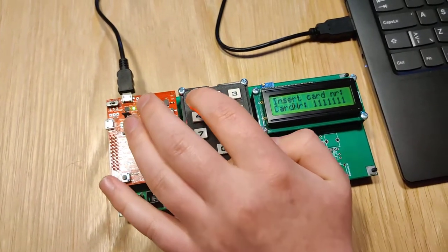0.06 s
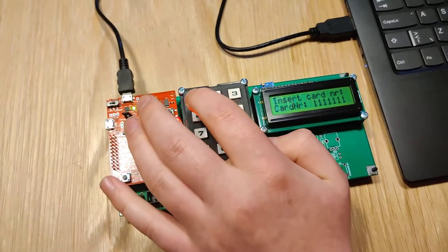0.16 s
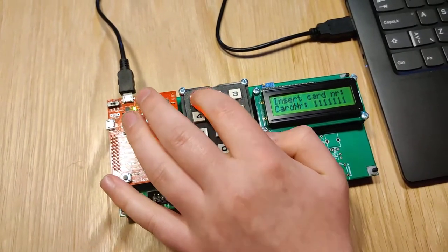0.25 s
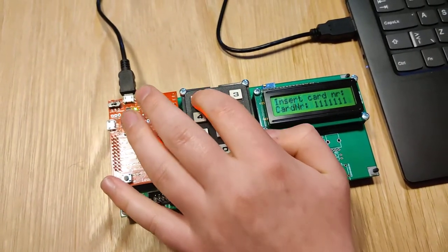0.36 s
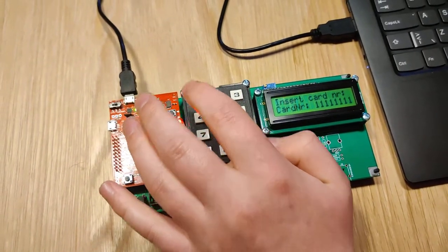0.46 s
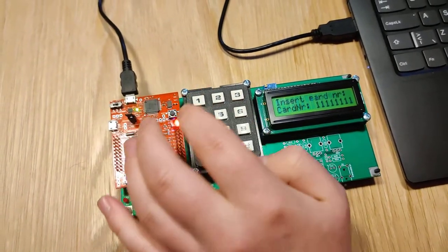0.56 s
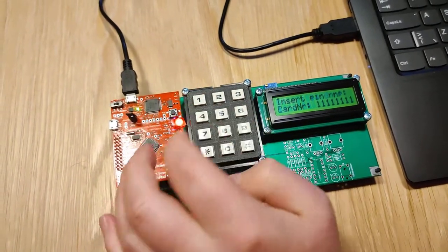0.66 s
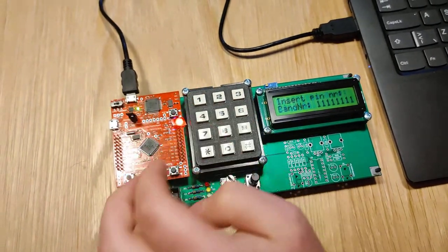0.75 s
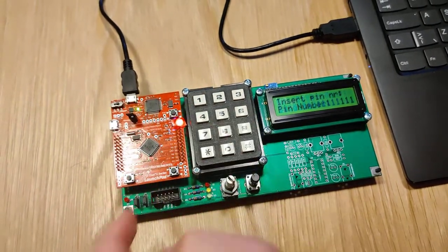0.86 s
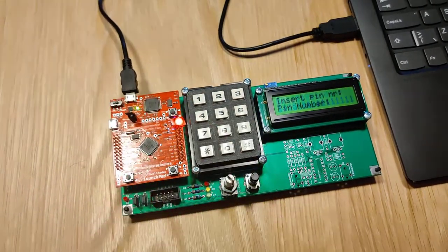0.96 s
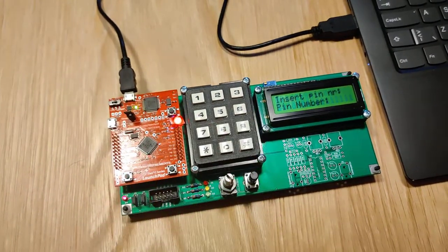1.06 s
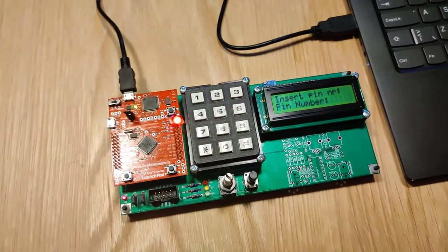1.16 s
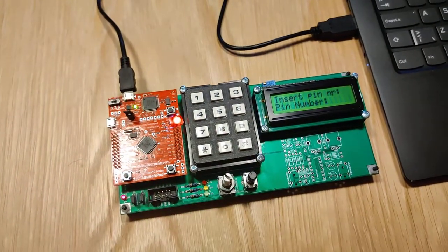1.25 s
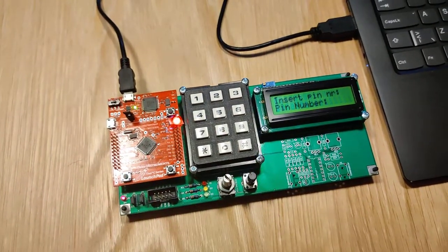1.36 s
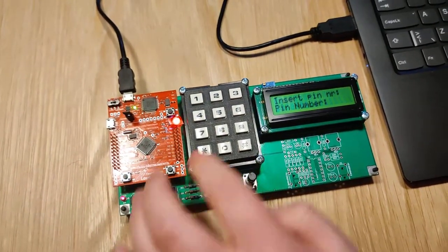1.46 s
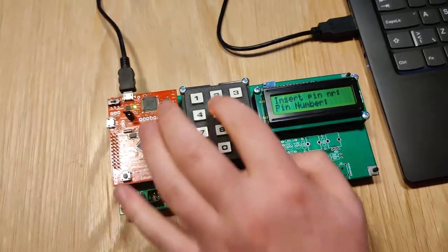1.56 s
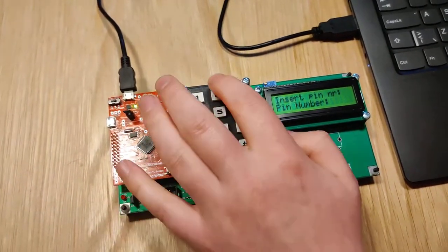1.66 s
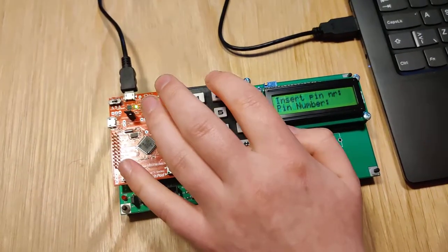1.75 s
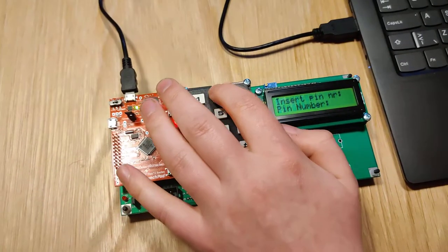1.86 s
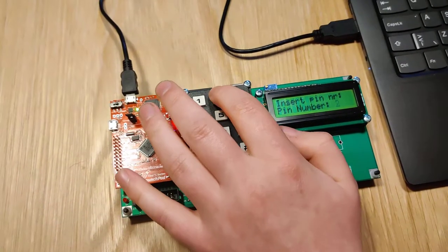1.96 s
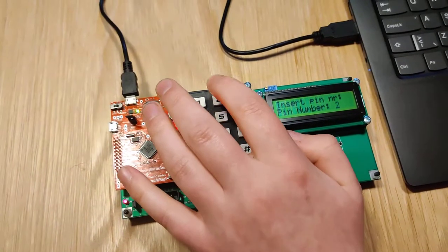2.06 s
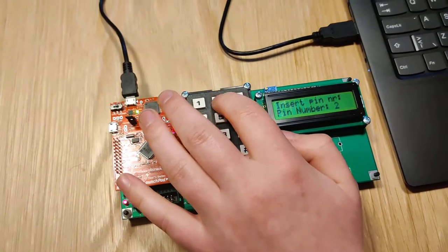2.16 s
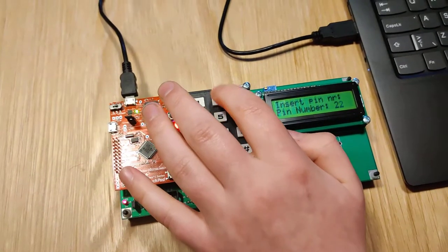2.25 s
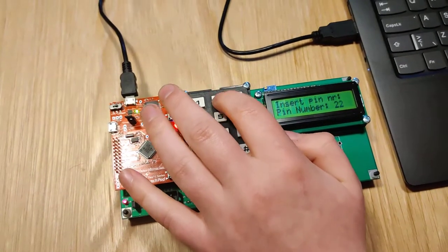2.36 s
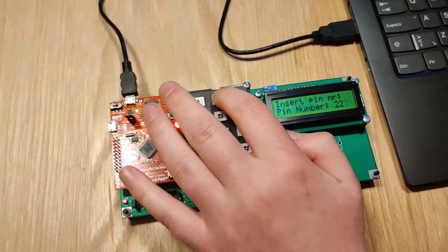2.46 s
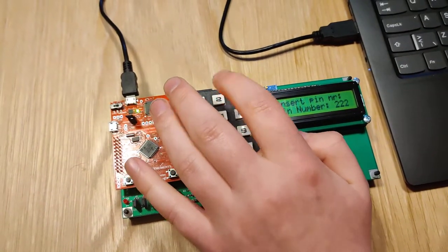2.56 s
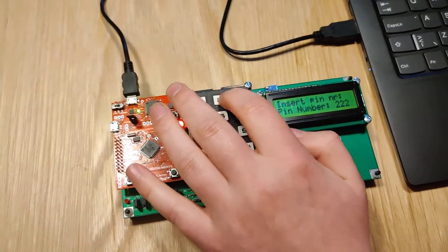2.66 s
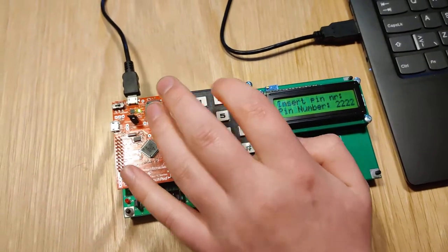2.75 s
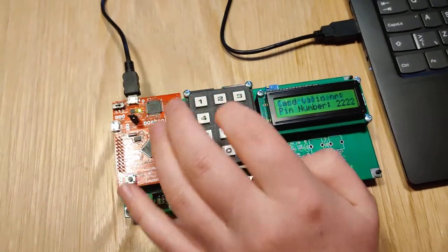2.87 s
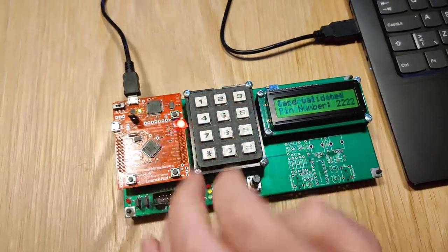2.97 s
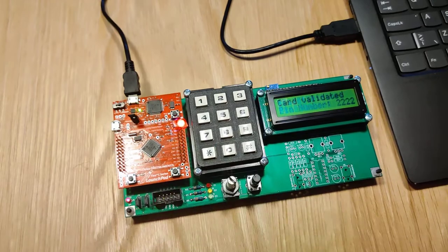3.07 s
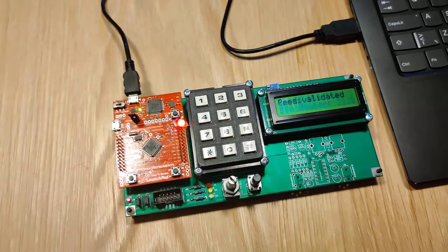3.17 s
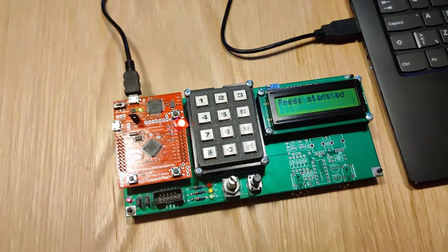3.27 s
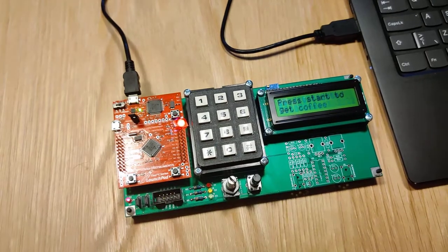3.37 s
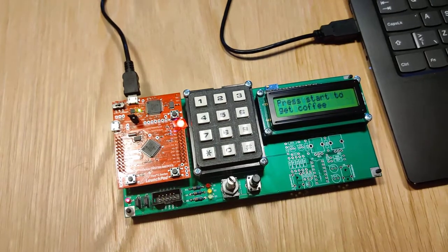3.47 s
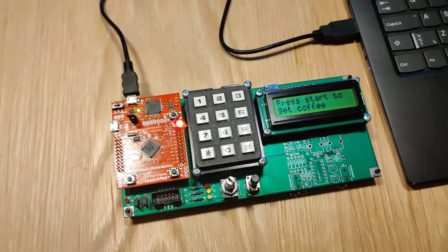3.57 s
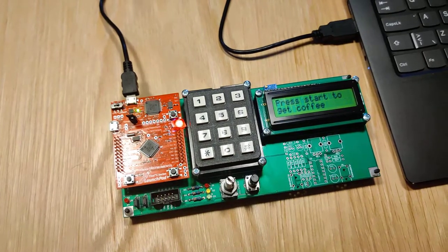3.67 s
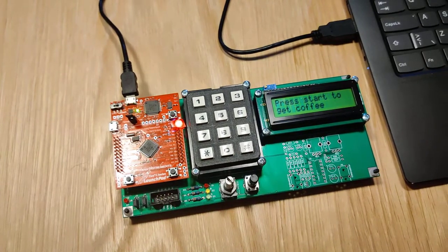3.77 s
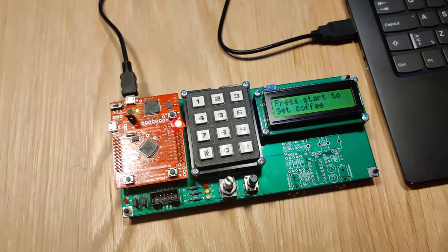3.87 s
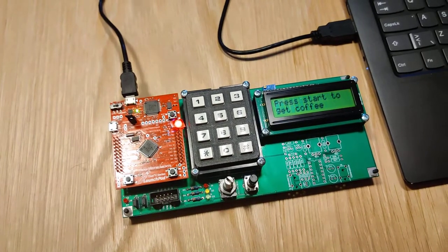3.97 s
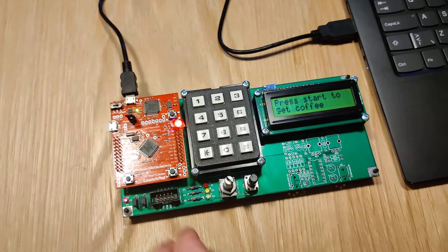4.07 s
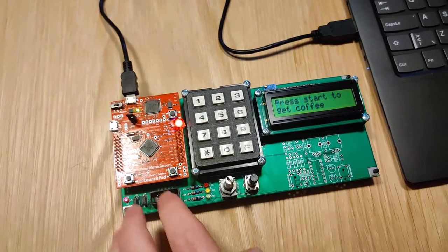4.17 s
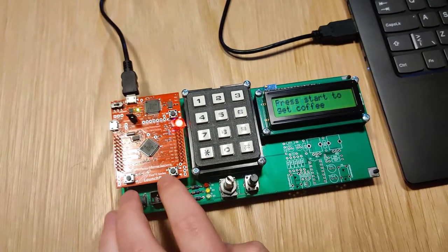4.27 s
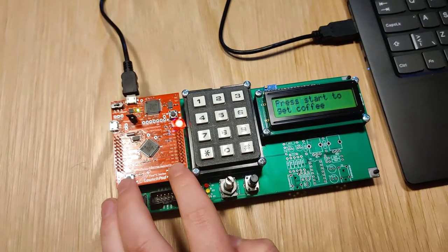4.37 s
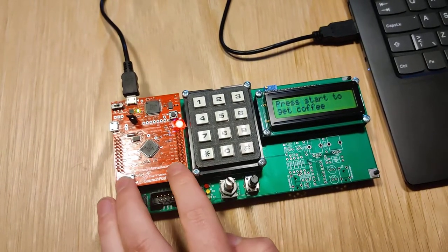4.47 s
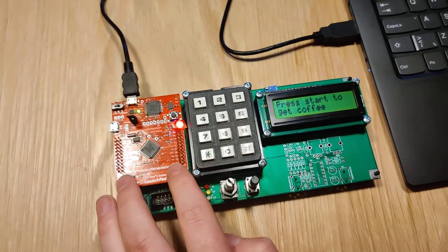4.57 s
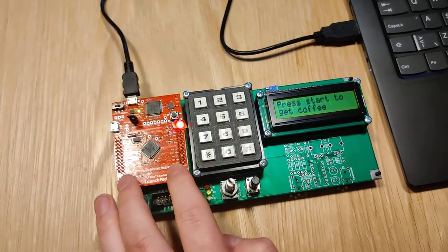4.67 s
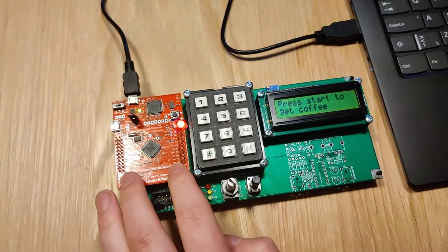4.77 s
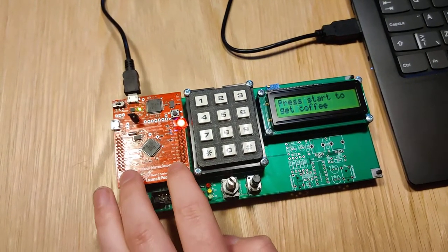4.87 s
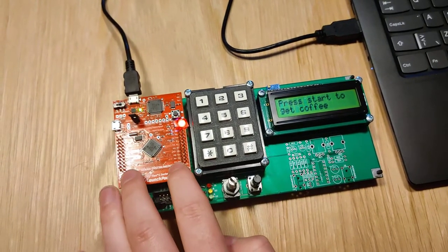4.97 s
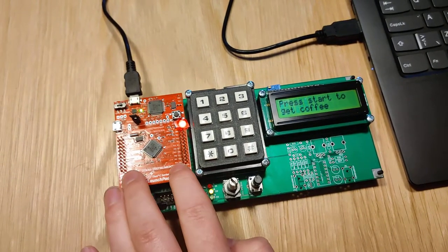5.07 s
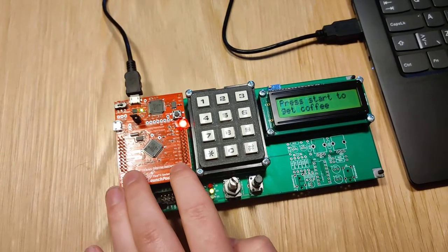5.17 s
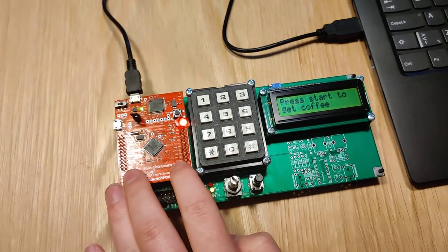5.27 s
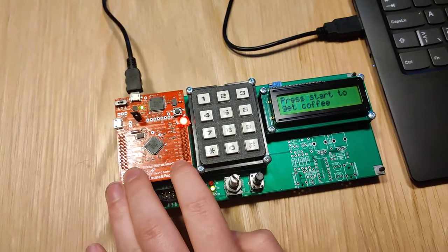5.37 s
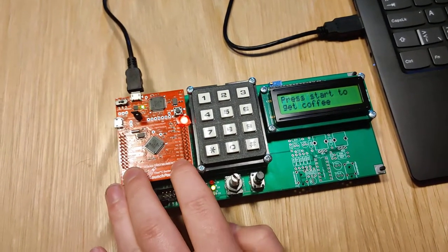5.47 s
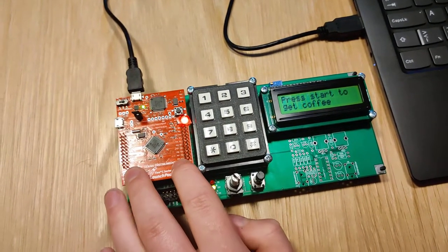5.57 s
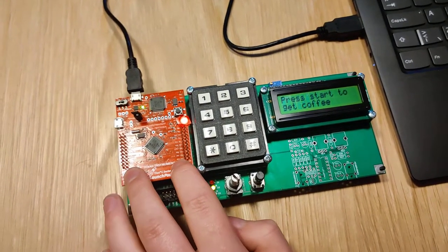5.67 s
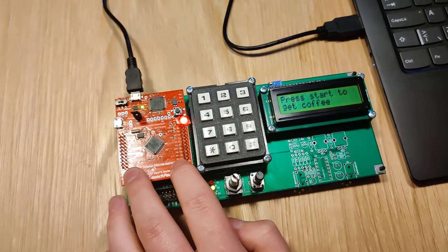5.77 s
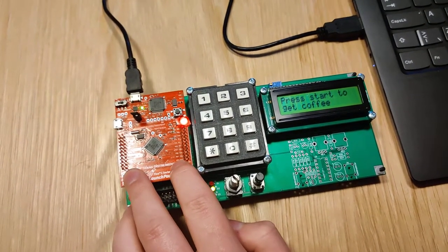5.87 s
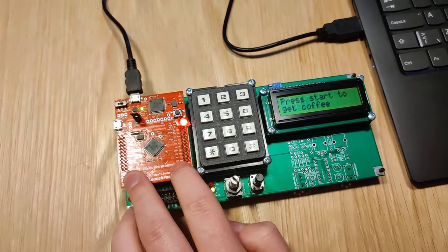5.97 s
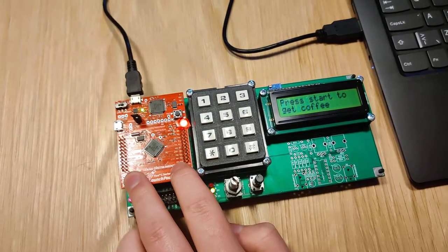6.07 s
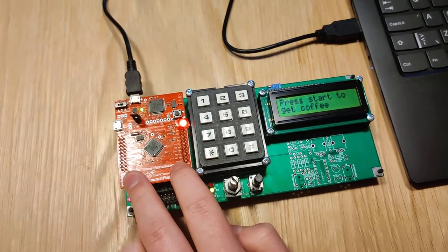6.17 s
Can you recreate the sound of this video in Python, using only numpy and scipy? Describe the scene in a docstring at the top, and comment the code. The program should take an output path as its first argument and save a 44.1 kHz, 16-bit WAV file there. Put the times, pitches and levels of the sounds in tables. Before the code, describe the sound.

Crisp keypad clicks, each a dry plastic snap with a small woody thump under it, are heard very close in a quiet indoor space. A single press opens, soft sleeve friction follows, then four presses come in rapid succession, the last brightest. After another sleeve rub and a dull hand bump, a small push switch gives a couple of thin ticks. Short near echoes, faint room tail, gentle rumble and hiss throughout.

```python
"""A quiet room, a circuit board on a wooden desk, close two-port microphone: keypad keys and a tiny switch click.
Clicks are knocks ringing damped plastic and board modes, plus a short snap; each press also thumps the
desk's own modes. Shaped noise makes the sleeve sliding over wood, the low rumble, the wash and the hiss;
wavering near sines make the hums. Near echoes and a room tail surround the clicks."""
import sys
import numpy as np
from scipy import signal
from scipy.io import wavfile
from scipy.ndimage import uniform_filter1d

SR = 44100
rng = np.random.default_rng(int(sys.argv[2]) if len(sys.argv) > 2 else 0)


def log_audio(samples):
    """Write samples as a 16-bit WAV file to the path given in sys.argv[1]."""
    # one column per channel
    frames = np.atleast_2d(samples).T
    # limit to full scale, then quantise
    limited = np.clip(frames, -1, 1)
    pcm = np.round(limited * 32767).astype(np.int16)
    wavfile.write(sys.argv[1], SR, pcm)


N = 274743  # length in samples


def gain_of(db):
    """Amplitude factor of a level in dB."""
    return 10 ** (np.asarray(db) / 20)


def evened(x):
    """Scales to rms 1."""
    return x / np.sqrt(np.mean(x ** 2) + 1e-20)


def read(points, hz):
    """Reads a table on a log-frequency axis."""
    f, value = np.transpose(points)
    return np.interp(np.log(hz + 1), np.log(f + 1), value)


def add(mix, s, sound):
    """Mixes a sound in at a time in seconds, cut at the end of the mix."""
    part = mix[..., round(s * SR):][..., :sound.shape[-1]]
    part += sound[..., :part.shape[-1]]


def swell(t, start, top, stop, start_db, stop_db):
    """Level in dB that climbs to 0 at the top and sinks again."""
    return np.interp(t, [start, np.clip(top, start, stop), stop], [start_db, 0, stop_db])


# left-right likeness of every noise, before each noise scales it: pitch_hz, likeness (no unit)
PORT_LIKENESS = [(60, 0.46), (180, 0.56), (550, 0.4), (1650, -0.1), (4970, 0.11), (15000, -0.1)]
# stereo balance of every noise: pitch_hz, left_minus_right_db
PORT_TILT = [(60, -2.5), (130, 2.5), (290, 0.5), (640, 0.0), (1410, 0.5), (3100, -3.5), (6820, -4),
             (15000, 5)]


def noise(colour, likeness, patchy_db, size=1024):
    """Two-port noise of rms 1 from random short-time spectra with drifting patches."""
    frames, hz = 4 * N // size + 5, np.fft.rfftfreq(size, 1 / SR)
    a, b, c, d, patches = rng.standard_normal((frames, len(hz), 5)).T
    patches = uniform_filter1d(patches, size=12, axis=0)  # smooth over frequency
    patches = evened(uniform_filter1d(patches, size=14, axis=1))  # smooth over time
    same = np.clip(likeness * read(PORT_LIKENESS, hz), -1, 1)[:, None]
    left = a + 1j * b
    right = same * left + np.sqrt(1 - same ** 2) * (c + 1j * d)
    tilt_db = np.multiply.outer([.5, -.5], read(PORT_TILT, hz))[..., None]
    level_db = read(colour, hz)[:, None] + patchy_db * patches + tilt_db
    spectra = np.array([left, right]) * gain_of(level_db)
    return evened(signal.istft(spectra, nperseg=size, noverlap=size - size // 4)[1][:, :N])


# level curve of the low rumble and mid wash: time_s, rumble_db, wash_db
BACKGROUND_LEVELS = [(0.0, -59, -64.5), (.43, -57, -66), (.75, -58, -66.5), (1.2, -56, -61),
                     (1.75, -55.5, -64.5), (2.25, -52, -63), (2.8, -44.5, -60.5), (3.05, -58.5, -63.5),
                     (3.6, -62, -65.5), (4.01, -56.5, -62), (4.35, -59.5, -64), (5.1, -56, -66.5),
                     (5.659, -60.5, -67.5), (6.23, -58, -67.5)]
# noise spectra, relative: pitch_hz, level_db (per Hz)
RUMBLE_COLOUR = [(7.1, -29.5), (14, -9), (30, -9), (44, 1.5), (56, -6.5), (75, -19.5), (112, -23.5),
                 (146, -27), (158, -15), (174, -23), (200, -23.5), (260, -46), (440, -120)]
WASH_COLOUR = [(71, -32), (120, -5.5), (151, -10.5), (173, -21), (226, -2.5), (280, -6.5), (316, -7),
               (1370, -18), (3000, -29), (3900, -52.5), (6600, -120)]
HISS_COLOUR = [(710, -38.5), (1200, -3), (1460, -9), (2510, -2), (3360, -7.5), (3700, -4), (4220, -7.5),
               (6160, -10), (8820, -13.5), (15000, -8), (16000, -7.5)]
HISS_DB = -67


def background():
    """Slowly changing low rumble, swelling under the key thumps, and mid wash over steady hiss."""
    t = np.arange(N) / SR
    s, rumble_db, wash_db = np.transpose(BACKGROUND_LEVELS)
    rumble = noise(RUMBLE_COLOUR, likeness=1.66, patchy_db=1.6, size=4096)
    rumble *= gain_of(np.interp(t, s, rumble_db))
    wash = noise(WASH_COLOUR, likeness=1.2, patchy_db=1.56, size=2048)
    wash *= gain_of(np.interp(t, s, wash_db))
    hiss = gain_of(HISS_DB) * noise(HISS_COLOUR, likeness=.9, patchy_db=1.5)
    return rumble + wash + hiss


# faint hums from outside, before wavering: start_s, loudest_s, end_s, first_hz, last_hz, top_db (rms)
HUM_SWELLS = [(2.4, 3.35, 3.95, 304, 322, -64), (2.95, 3.4, 3.9, 378, 390, -69),
              (4.65, 5.4, 6.22, 145, 147, -68), (1.4, 1.65, 1.9, 226, 234, -63),
              (2.5, 3.2, 3.85, 90, 90, -64), (4.5, 5.8, 6.22, 47, 48, -61), (.01, .12, .36, 62, 60, -61),
              (.01, .12, .28, 338, 335, -67)]
HUM_ENDS_DB = -8  # below the top at either end


def hums():
    """Near sines that swell, drift in pitch and waver."""
    out = np.zeros(N)
    for start, top, stop, first_hz, last_hz, db in HUM_SWELLS:
        t = np.arange(start, stop, 1 / SR)
        waver = uniform_filter1d(rng.standard_normal(N), size=3000)
        waver = evened(uniform_filter1d(waver, size=3000))
        hz = np.linspace(first_hz, last_hz, len(t)) * (1 + .005 * waver[:len(t)])
        turns = np.cumsum(hz) / SR
        level_db = db + swell(t, start, top, stop, HUM_ENDS_DB, HUM_ENDS_DB)
        level_db += 1.6 * waver[::-1][:len(t)]  # the reversed curve wavers the level
        sine = np.sqrt(2) * np.sin(2 * np.pi * turns)
        add(out, start, gain_of(level_db) * sine * signal.windows.tukey(len(t), .2))
    return out


# the key cap striking its stop: pitch_hz, length_s, left_minus_right_db, left_lead_rad
CAP_SNAP = (7400, .00062, -6, 2.)


def stop_snap(since, side):
    """A short sine burst under a rounded envelope, as the cap strikes its stop."""
    hz, length, pan_db, lead = CAP_SNAP
    envelope = np.sin(np.pi * np.minimum(since / length, 1)) ** 2
    return gain_of(side * pan_db) * envelope * np.sin(2 * np.pi * hz * since + side * lead)


TOUCH_S, TOUCH_DB = 0.0038, -39  # rubbing before each blow
BUILD_UP = 0.037  # share of its t60 that a mode needs to build up
SNAP_AT = 0.93  # share of the rise that passes before the snap
RATTLE_S, RATTLE_PER_RISE = 0.0018, 0.77  # a slower stroke rattles longer


def click(row, modes, luck, low_hz, split_hz, bright_hz):
    """Touch, rattle of knocks on damped modes, and snap; returns the direct and the spread sound."""
    _, rattle_db, snap_db, ring_db, bright_db, rise, _ = row
    rattle_s = RATTLE_S + RATTLE_PER_RISE * rise
    t, side = np.arange(2048) / SR, np.array([[.5], [-.5]])
    since = np.maximum(t - TOUCH_S, 0)
    strength = np.exp(-since / max(rattle_s, 3e-4)) * np.minimum(since / max(rise, 1e-4), 1) ** 2
    strength += gain_of(TOUCH_DB) * (t < TOUCH_S)  # the key rubs faintly on its way
    knocks = (strength * luck[:len(t)])[None]
    sound, spread = np.zeros((2, 2, len(t)))
    for k, (hz, mode_db, t60, pan_db, lead) in enumerate(modes):
        boost_db = ring_db if hz < split_hz else bright_db if hz > bright_hz else 0
        boost_db += 1.5 * luck[-k - 1]  # each blow lands a little differently
        t60 = np.clip(t60, .001, 75 / hz)  # plastic dies within 75 cycles
        wave = gain_of(mode_db + boost_db + side * pan_db) * np.sin(2 * np.pi * hz * t + side * lead)
        ring = wave * gain_of(-60 * t / t60) * (1 - np.exp(-t / (BUILD_UP * t60)))
        rung = signal.fftconvolve(ring, knocks, axes=1)[:, :len(t)]
        sound += rung * np.linalg.norm(ring) / np.linalg.norm(rung)  # every mode takes its share of the blow
        blur = 1 if t60 > .017 else 3  # over all directions only the longer-ringing modes stay sharp
        spread += wave * np.sqrt(blur) * gain_of(-60 * blur * t / t60)
    snap = stop_snap(np.maximum(since - SNAP_AT * rise, 0), side)
    sound = gain_of(rattle_db) * sound / abs(sound.mean(0)).max()
    sound += gain_of(snap_db) * snap / abs(snap.mean(0)).max()
    spread *= np.linalg.norm(sound) / np.linalg.norm(spread)
    high_pass = signal.butter(3, low_hz, "high", fs=SR, output="sos")
    return signal.sosfilt(high_pass, [sound, spread])


# ringing modes of the desk top, before the spread from blow to blow: pitch_hz, level_db, t60_s
DESK_MODES = [(39, -13.5, 0.713), (59, 2.5, 0.31), (86.1, -1, 0.22), (139, -7, 0.28), (212.5, -7, 0.39),
              (252, -11, 0.21), (311.3, -12.5, 0.2), (383, -10.5, 0.075), (505, -14.5, 0.035),
              (629, -15, 0.04), (835, -11.5, 0.03), (1100, -20, 0.061), (1450, -25, 0.037)]
SPOT_DB, SPOT_PITCH = 2., .015  # spread of the desk modes from blow to blow: dB, share of pitch


def thump(db, contact, hard_db, luck):
    """A push rings the desk top; longer contact leaves only the low modes."""
    t = np.arange(SR) / SR
    ring = np.zeros(SR)
    for (hz, mode_db, t60), (level_luck, pitch_luck) in zip(DESK_MODES, luck):
        octaves = np.log2(hz / DESK_MODES[0][0])
        level_db = mode_db + SPOT_DB * level_luck + hard_db * octaves - 60 * t / t60
        ring += gain_of(level_db) * np.sin(2 * np.pi * hz * (1 + SPOT_PITCH * pitch_luck) * t)
    push = np.hanning(round(max(contact, .0002) * SR))
    sound = signal.fftconvolve(ring, push)
    return gain_of(db + np.array([[.6], [-.6]])) * sound / abs(sound).max()


# key strokes, down and up, with the faint ticks between:
# start_s, rattle_db, snap_db, board_ring_db, brightness_db, rise_s, desk_thump_db
KEY_STROKES = [(.3322, -19.5, -17.5, 6, 5, 0.00083, -35.5), (.4142, -18, -22, 4, 8, 0.00016, -39),
               (1.9265, -18.5, -17.5, 5.5, 4.5, 0.0011, -35.5), (2.008, -45, -70, 2, -11, .0005, -54.5),
               (2.0182, -12, -16, 0, 8.5, 0.00017, -43.5), (2.1825, -25, -33, 1.5, 4, 0.0037, -32),
               (2.2705, -43, -70, -1.5, -5, .0005, -51.5), (2.2795, -20, -26, 3, 4.5, 0.001606, -42),
               (2.4245, -23, -44.5, 0, 2.9, 0.0041, -32.5), (2.483, -42, -69, -2, -4, .0005, -61.5),
               (2.5064, -15.5, -27, 0.5, 4, 0.000322, -38.5), (2.6884, -14, -25.5, 4.5, 7, 0.000887, -34.5),
               (2.7078, -26.5, -49, 17, -31, 0.000414, -30),
               (2.7521, -9.5, -16.5, -4.5, 10.5, 0.00011, -42)]
# keypad and board modes; click() caps the decay: pitch_hz, level_db, t60_s, left_minus_right_db, left_lead_rad
KEYPAD_MODES = [(1300, -11, 0.026, 14, 0.1), (1950, -3, .03, -2, .3), (2510, -6, 0.005, -23, 0.26),
                (3095, 8, 0.0065, -12, 0.21), (4066, 3.5, 0.00683, -12, 0.36),
                (4540, 10, 0.0047, 7.5, 0.33), (6240, -2.5, .004, -2, 0.92), (6750, 6, 0.0043, -9.5, 0.31),
                (7530, 7.5, 0.00441, 3, 2.08), (7870, -23.5, .004, -2, 2), (9570, -16, 0.0016, 13, 0.83),
                (12790, -13, 0.004, -1, 0.97), (15200, -8, 0.0029, -4.5, 0.86)]
# push switch and finger taps on the board:
# start_s, rattle_db, snap_db, board_ring_db, brightness_db, rise_s, desk_thump_db
SWITCH_TAPS = [(3.956, -54, -63, -18, 22, 0.0019, -65), (3.9764, -43.5, -45, -3, 12, 0.0013, -81),
               (4.655, -25, -47, 5, 15, 0.00146, -44), (4.8985, -30.5, -37.5, 2.5, 20.5, 0.00008, -46.5),
               (5.527, -46.5, -72, -1, -14, 0.0011, -48.5), (5.939, -55.5, -66, -23, 18, .001, -60)]
# modes of the switch corner; click() caps the decay: pitch_hz, level_db, t60_s, left_minus_right_db, left_lead_rad
CORNER_MODES = [(855, -12, 0.013, 6, .1), (1218, -12, 0.0091, 17, .1), (1460, -20, 0.012, -8, .1),
                (2000, -10, 0.0068, 32, 0.25), (2140, 0, .022, -4, .3), (2670, 5.5, 0.0033, -20, 0.13),
                (3480, 12, 0.0016, 4, 0.4), (4280, -5.5, 0.005, 23, 2.57), (6300, -8.5, 0.0021, -9.5, 0.51),
                (8500, -23, 0.001, 32, 0.83), (11900, -18, 0.00084, -11, 2.9)]
# an arm or hand lands on the desk; thump() floors the contact: start_s, level_db, contact_s, hardness_db_per_octave
ARM_BUMPS = [(3.204, -35.5, 0.011, -31), (3.977, -32.5, 0.00016, 4.5)]


def fingers():
    """Presses excite board and desk: direct clicks, their spread sound for the room, and desk thumps."""
    clicks, spreads, thumps = np.zeros((3, 2, N))
    strokes = KEY_STROKES + SWITCH_TAPS
    luck = rng.standard_normal((len(strokes), 2100))
    spots = rng.standard_normal((len(strokes) + len(ARM_BUMPS), len(DESK_MODES), 2))
    for k, row in enumerate(strokes):
        on_keypad = k < len(KEY_STROKES)
        modes, low_hz = (KEYPAD_MODES, 1650) if on_keypad else (CORNER_MODES, 900)  # small parts radiate no bass
        sound, spread = click(row, modes, luck[k], low_hz, split_hz=2600, bright_hz=5200)
        start, thump_db = row[0], row[-1]
        add(clicks, start - TOUCH_S, sound)
        add(spreads, start, spread)
        add(thumps, start + 0.005, thump(thump_db, contact=0.00033, hard_db=1.9, luck=spots[k]))
    for (start, *blow), spot in zip(ARM_BUMPS, spots[::-1]):
        add(thumps, start, thump(*blow, spot))
    return clicks, spreads, thumps


# echoes off things on the desk: delay_s, level_db
NEAR_ECHOES = [(.0075, -13), (0.0128, -26), (0.022, -41.5)]


def echoes(x):
    """Near surfaces return each click as a short smeared burst."""
    t, taps = np.arange(768) / SR, np.zeros((2, 2048))
    for delay, db in NEAR_ECHOES:
        burst = rng.standard_normal((2, len(t))) * np.exp(-t / .003) * np.minimum(t / .001, 1)
        add(taps, delay, gain_of(db) * burst / np.linalg.norm(burst[0]))
    return signal.fftconvolve(x, taps, axes=1)[:, :N]


# decay of the room: pitch_hz, t60_s
ROOM_DECAY = [(500, 0.54), (1500, 0.17), (3000, 0.39), (6500, 0.38), (10000, .28), (15000, 0.4)]
# colour of the room tail, before room() scales it by 0.36: pitch_hz, level_db (per Hz)
TAIL_COLOUR = [(350, -38.5), (600, -11), (779, -14.5), (984, 0.5), (1390, -12.5), (1950, 6), (2310, -6.5),
               (2950, -19), (3990, -14), (5120, -4.5), (6830, -20), (10900, -15), (16000, -21.5)]


def room(x):
    """Sparse taps of random sign, each band dying at its own speed; three tails take turns."""
    out = np.zeros((2, N))
    turn = np.arange(N) / SR * 2 * np.pi * 1.5  # 1.5 turns per second
    for k in range(3):
        taps = np.zeros((2, SR // 2))
        at = np.arange(260, SR // 2 - 20, 20)
        at = at + rng.integers(0, 20, (2, len(at)))  # one tap somewhere in every 20 samples
        np.put_along_axis(taps, at, rng.choice([-1., 1.], at.shape), 1)
        hz, t, spectra = signal.stft(taps, SR, nperseg=256)
        decay_db = -60 * t / read(ROOM_DECAY, hz)[:, None]
        colour_db = 0.36 * read(TAIL_COLOUR, hz)[:, None]
        tail = signal.istft(spectra * gain_of(decay_db + colour_db), SR, nperseg=256)[1]
        tail /= np.linalg.norm(tail[0])
        share = np.sqrt(2 / 3) * np.cos(turn + k * 2 * np.pi / 3)
        out += signal.fftconvolve(x * share, tail, axes=1)[:, :N]
    return out


# strokes of the sleeve: start_s, fastest_s, stop_s, top_db
SLEEVE_SLIDES = [(0.906, 1.126, 1.35, -57), (1.556, 1.634, 1.75, -67.5), (2.97, 3.236, 3.33, -56),
                 (3.92, 4.117, 4.4, -60)]
# spectrum of sleeve on wood, relative: pitch_hz, level_db (per Hz)
SLEEVE_COLOUR = [(470, -35), (800, -4), (1190, -6.5), (1720, -16.5), (2010, -1.5), (2410, -3.5),
                 (3130, -0.5), (3660, -5), (4130, 0.5), (5630, -9), (6740, -1.5), (8780, -16),
                 (14000, -17.5)]
SLIDE_START_DB, SLIDE_STOP_DB, SLIDE_EDGE_S = -6.5, -10.5, 0.075  # below the top at either end; fade at the ends


def sleeve():
    """Cloth friction noise that grows with the speed of the arm."""
    t, level = np.arange(N) / SR, np.zeros(N)
    for start, top, stop, db in SLEEVE_SLIDES:
        fade = np.clip(np.minimum(t - start, stop - t) / SLIDE_EDGE_S, 0, 1)
        level += fade * gain_of(db + swell(t, start, top, stop, SLIDE_START_DB, SLIDE_STOP_DB))
    return level * noise(SLEEVE_COLOUR, likeness=0.89, patchy_db=-0.6, size=512)


def scene():
    """Clicks with their echoes and room, desk thumps, sleeve, hums and background."""
    clicks, spreads, thumps = fingers()
    radiated = spreads + 0.66 * clicks + 0.9 * thumps
    reflected = echoes(radiated) + gain_of(-13.5) * room(radiated)
    return clicks + reflected + thumps + sleeve() + hums() + background()


EDGE_HZ, LIMIT_HZ = 15850, 16650  # port filter edge, band limit


def record(dry):
    """The port filter weakens all above one edge to 0.12; then the band limit cuts the top."""
    edges_hz = [0, EDGE_HZ - 100, EDGE_HZ + 100, SR / 2]
    shelf = signal.firwin2(511, edges_hz, [1, 1, .12, .12], fs=SR)
    limit = signal.firwin(511, LIMIT_HZ, window=("kaiser", 9), fs=SR)
    return signal.oaconvolve(dry, np.convolve(shelf, limit)[None], "same")


dry = scene()
out = record(dry)
log_audio(out)
```